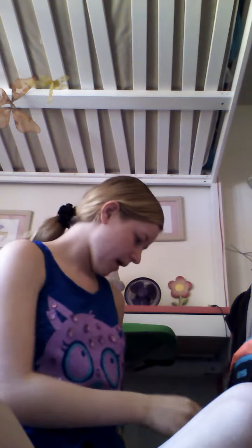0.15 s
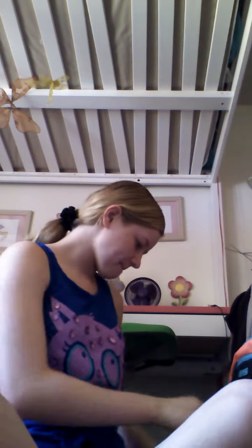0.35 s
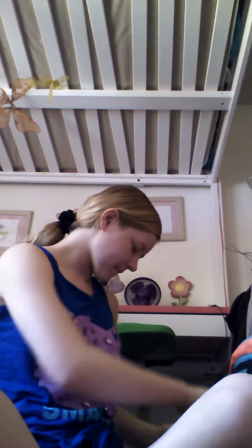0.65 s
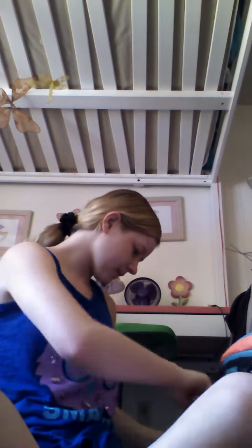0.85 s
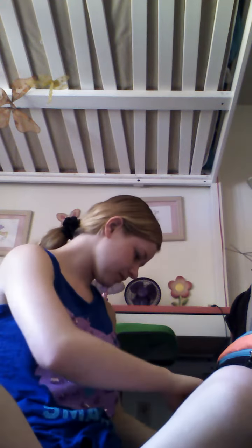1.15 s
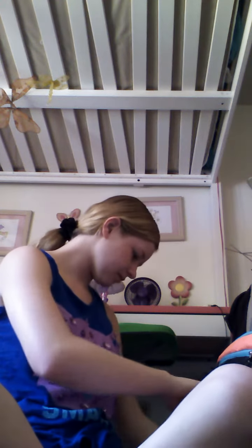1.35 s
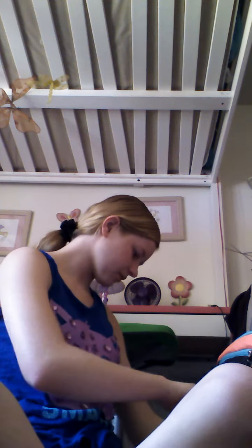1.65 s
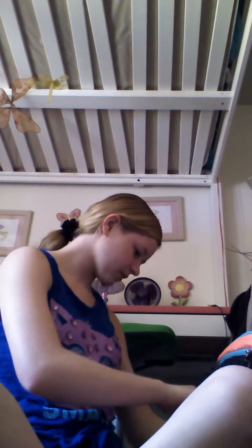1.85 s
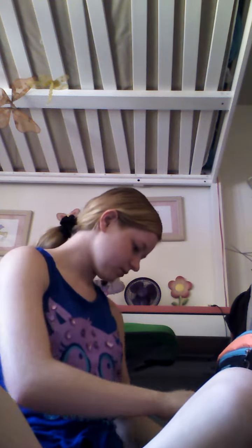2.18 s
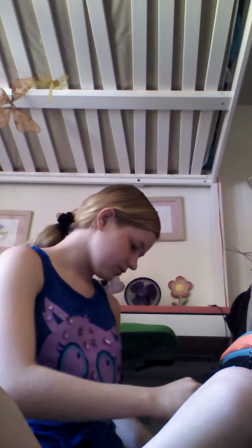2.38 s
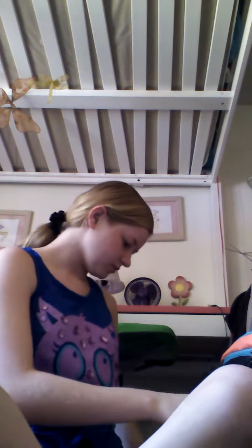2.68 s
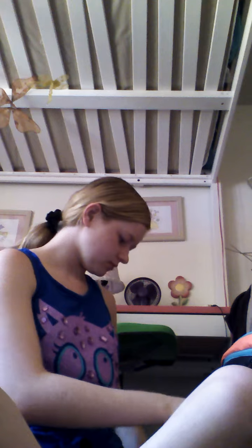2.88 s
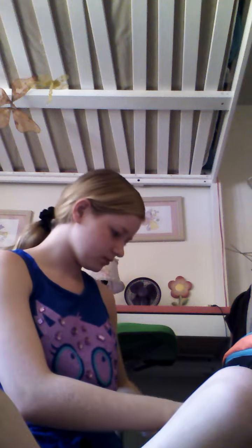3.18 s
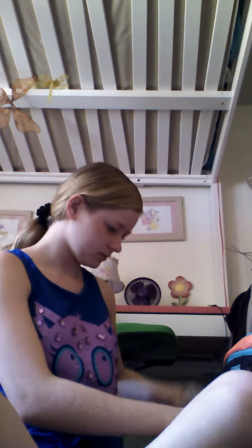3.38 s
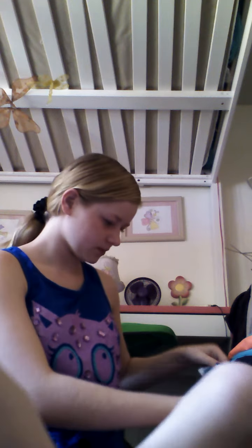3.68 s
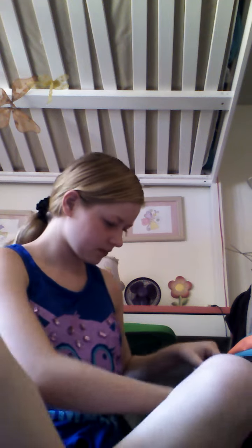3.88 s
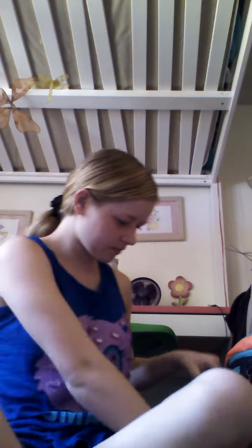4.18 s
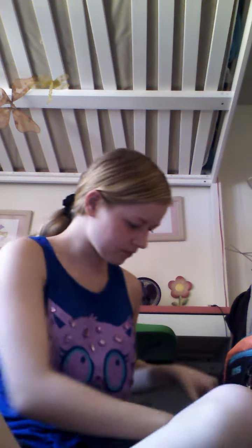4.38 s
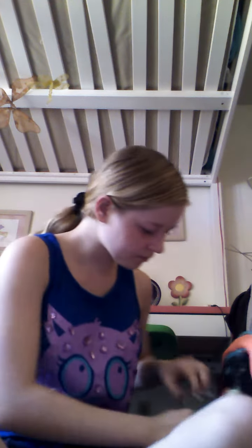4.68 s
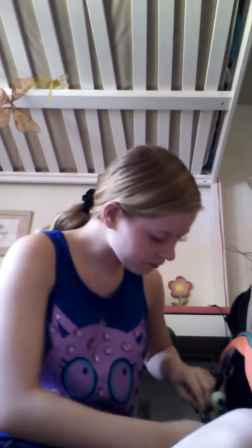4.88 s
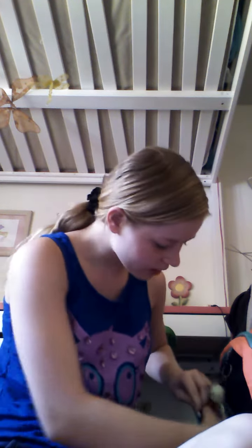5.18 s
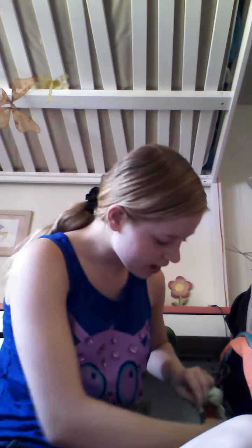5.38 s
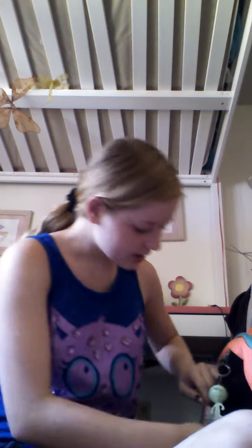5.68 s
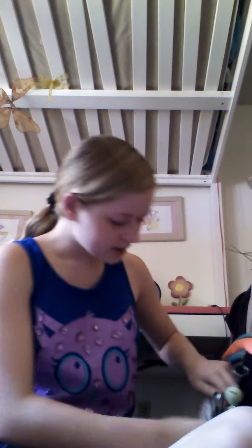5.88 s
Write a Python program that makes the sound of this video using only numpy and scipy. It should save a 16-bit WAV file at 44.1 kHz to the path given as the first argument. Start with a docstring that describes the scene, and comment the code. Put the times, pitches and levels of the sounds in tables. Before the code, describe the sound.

One quick zip clicks to a stop, then after faint handling come two more zips, small ticks and fabric rustling.

```python
"""A coil zipper on a nylon backpack runs in three jerky pulls, the first ending on its stop.
Its teeth excite the fabric periodically, so pitch follows the speed of the slider. Hands knock the bag,
plastic charms and the pull tab tick (damped vibration), and cloth rubs and squeaks (friction).
A quiet bedroom reverberates briefly, and coarse quantisation makes its noise floor grainy."""
import sys
import numpy as np
from scipy import signal
from scipy.fft import rfft, irfft, next_fast_len
from scipy.io import wavfile
from scipy.ndimage import uniform_filter1d, map_coordinates

SR = 44100
rng = np.random.default_rng(int(sys.argv[2]) if len(sys.argv) > 2 else 0)


def to_wav(s):
    """Save 16-bit WAV."""
    ch = np.atleast_2d(s).T  # columns
    pcm = np.round(np.clip(ch, -1, 1) * 32767)  # PCM
    wavfile.write(sys.argv[1], SR, pcm.astype(np.int16))


N = 266319

# Noise spectra. Each row: frequency in Hz, relative spectral density in dB.
FLOOR_SPECTRUM = [(12, -36), (20, -1.5), (26, -20), (59, -6), (87, -17), (144, -3), (225, -15),
                  (274, -17.5), (372, -13.5), (667, -28), (857, -29.5), (1580, -30), (2210, -32),
                  (15500, -53.5)]
CLOTH_BODY_SPECTRUM = [(35, -58.5), (60, -22), (141, -4), (240, -12), (350, -9), (550, -15.5), (710, -19.5),
                       (1100, -23.5), (1430, -50.5), (2420, -120)]
CLOTH_MIDDLE_SPECTRUM = [(470, -25.5), (800, -8), (1330, -2.5), (1500, 0.5), (1610, 2.5), (4000, -16),
                         (5200, -47.5), (8800, -120)]
CLOTH_HISS_SPECTRUM = [(1760, -13), (3000, 0), (4690, -9), (6650, -3.5), (7480, -13), (9310, -22),
                       (12500, -19.5), (13700, -16.5), (15500, -30)]
TOOTH_CLICK_SPECTRUM = [(760, -30.5), (1300, -12), (1440, -8), (1700, -7), (1960, -3), (2210, -4.5),
                        (3370, -21), (5000, -30), (6500, -62), (11000, -120)]
SLIDER_SCRAPE_SPECTRUM = [(1760, -13.5), (3000, -6), (3130, -4.5), (5450, -15.5), (6610, -12),
                          (7320, -24.5), (8700, -25), (10800, -28.5), (13500, -26), (15500, -32.5)]
# Reverberation of the room. Each row: frequency in Hz, time to decay by 60 dB in seconds.
ROOM_T60 = [(150, 0.29), (1500, 0.21), (10000, 0.16)]
# Squeaks, thin whistles and a low thrum.
# Each row: start and end in seconds, level in dB, frequency in Hz, linewidth in Hz.
HELD_TONES = [(0.561, .64, -67, 720, 90), (4.003, 4.085, -49.5, 3060, 380), (4.141, 4.18, -47.5, 3113, 400),
              (4.576, 4.623, -79, 14070, 8), (5.277, 5.307, -53.5, 4380, 500), (5.552, 5.598, -53, 148, 5),
              (5.599, 5.652, -45, 146, 4.6), (5.844, 5.885, -69, 14070, 30)]
# Cloth on cloth. Each row: peak time, swell time and 60 dB decay time in seconds,
# then relative levels of body, middle and hiss in dB.
CLOTH_RUBS = [(.248, 0.0091, .36, -35, -42, -50), (0.611, 0.14, 0.23, -64, -76, -87.5),
              (.738, 0.023, 0.3, -53.5, -61, -88.5), (0.924, 0.18, 0.16, -68, -67, -87),
              (1.002, 0.019, 0.27, -54.5, -55, -78), (1.33, 0.37, 0.69, -74.5, -74, -85),
              (1.482, 0.034, 0.43, -47.5, -52.5, -68), (1.834, 0.21, 0.14, -60, -64.5, -73.5),
              (2.261, 0.021, 0.71, -66, -73, -79), (2.394, 0.022, 0.14, -64.5, -80, -80.5),
              (3.276, 0.038, 0.67, -61.5, -67, -89.5), (3.678, 0.09, 1, -47, -55, -67),
              (4.299, 0.038, .8, -49.5, -57.5, -69), (4.528, 0.037, 0.37, -59, -74, -82),
              (4.575, .01, 0.38, -51, -57, -66.5), (4.854, .012, 0.54, -48, -54, -69.5),
              (4.957, 0.017, 0.25, -53, -66, -66), (5.23, .15, .4, -70, -70, -82.5),
              (5.306, 0.067, 0.47, -52.5, -56, -61.5), (5.57, .07, 0.5, -49, -46.5, -75),
              (5.628, 0.15, 0.42, -45.5, -51, -65.5), (5.82, 0.0054, 0.43, -42, -46, -60.5),
              (5.879, 0.15, 0.19, -43.5, -52, -53.5), (6.039, 0.065, .2, -50, -51, -80)]
# Hands and slider striking the bag. Each row: start in seconds, relative level in dB, pitch in Hz.
BAG_KNOCKS = [(0.2445, -26, 307), (0.262, -27.5, 478), (0.289, -38, 368), (0.733, -54.5, 251),
              (1.0, -41, 367), (1.474, -44, 271.5), (1.588, -55.5, 457), (1.827, -55, 442),
              (2.259, -52.5, 356), (2.308, -58, 315), (2.39, -56, 411), (3.258, -50.5, 428),
              (3.28, -46, 532), (3.321, -39, 533), (3.342, -38, 585), (3.852, -51.5, 331),
              (3.891, -42.5, 407), (4.239, -33, 460), (4.3, -35.5, 496.7), (4.521, -45.5, 355),
              (4.808, -59.5, 242), (4.846, -45.5, 316), (4.903, -41, 296), (4.953, -36, 323),
              (5.307, -56.5, 362), (5.421, -54.5, 422), (5.556, -42.5, 448), (5.685, -51, 485),
              (5.736, -48.5, 438), (5.816, -29, 337), (5.849, -40, 387), (5.891, -36.5, 359)]
# Charms and pull tab. Each row: start in seconds, relative level in dB, pitch in Hz.
CHARM_TICKS = [(0.2412, -28.5, 2060), (0.2624, -32, 1839), (0.7376, -56.5, 1996), (0.9186, -59, 1488),
               (1.0008, -50.5, 1743), (1.0186, -52, 1274), (1.0997, -57, 1477), (1.4748, -43, 1802),
               (1.4849, -45, 1930), (1.5049, -48.5, 2027), (1.7883, -57.5, 3150), (2.2647, -61.5, 1310),
               (3.0954, -58.5, 1550), (3.7559, -46, 1656), (3.897, -50.5, 1945), (4.572, -32.5, 1945),
               (4.5814, -33.5, 1850), (4.5994, -36, 2110), (4.6778, -69.5, 2040), (4.73, -57.5, 1976),
               (4.8519, -52.5, 2040), (4.887, -47, 3100), (4.958, -50.5, 2090), (5.3025, -38.5, 2615),
               (5.3032, -34, 4100), (5.3146, -40, 3810), (5.3547, -51.5, 3705), (5.5186, -52.5, 1542),
               (5.8199, -40, 1825), (5.8785, -48, 2040), (6.0264, -58, 1420)]
# The slider's travel, one list per pull. Each row: time in seconds, tooth rate in Hz,
# then relative levels of panel fundamental, overtones, clicks and scrape in dB.
ZIPPER_PULLS = [
    [(0.085, 379.8, -82.5, -89, -75, -84), (0.126, 581.7, -50, -70, -55.5, -68),
     (0.15, 714.4, -45.5, -74, -60.5, -60), (0.172, 850, -55.5, -63.5, -51, -54.5),
     (0.194, 850.4, -49, -52, -47.5, -51.5), (0.212, 1065, -57, -53.5, -53.5, -56.5),
     (0.243, 1016, -38.5, -53, -44, -42)],
    [(3.345, 146, -57.5, -68.5, -102.5, -71), (3.381, 203.4, -38, -41.5, -56.5, -91.5),
     (3.411, 315, -41.5, -33, -58, -69.5), (3.432, 375.3, -41, -35.5, -44, -57.5),
     (3.455, 482, -47.5, -41, -42, -52.5), (3.467, 496, -28.5, -45, -38.5, -49),
     (3.495, 493, -38.5, -44.5, -34.5, -49), (3.531, 493, -31, -43, -32.5, -46),
     (3.55, 496.6, -51, -33, -36, -44), (3.568, 430.5, -35.5, -43, -57.5, -55.5),
     (3.59, 452.3, -36, -40, -48, -46), (3.612, 499.3, -53.5, -56.5, -42.5, -55),
     (3.632, 493, -36.5, -47, -42.5, -50), (3.654, 493.6, -55, -75, -55.5, -60.5),
     (3.69, 450, -77, -76, -77, -99.5)],
    [(3.945, 178.6, -52.5, -59, -61, -63.5), (3.965, 230.3, -38, -55.5, -59.5, -63.5),
     (3.991, 404.7, -36, -53, -50, -55.5), (4.015, 502.3, -46, -42, -51.5, -51),
     (4.03, 568.6, -45.5, -61.5, -41.5, -50.5), (4.067, 602, -52, -49, -45, -49.5),
     (4.084, 662.8, -52, -56, -48.5, -50.5), (4.093, 538.8, -36.5, -54, -49.5, -52.5),
     (4.106, 397.7, -35.5, -58, -60, -54.5), (4.13, 317.8, -36.5, -60.5, -49.5, -51),
     (4.196, 390.7, -38.5, -51.5, -55.5, -51.5), (4.21, 368.4, -44.5, -62, -61.5, -58.5),
     (4.224, 336.4, -48, -41, -45, -55.5), (4.268, 289, -40, -53.5, -52, -51),
     (4.33, 266.5, -75, -92.5, -83, -69.5)],
]


def amp(db):
    """Amplitude ratio of a level in decibels."""
    return 10 ** (np.asarray(db) / 20)


def unit(x):
    """Normalisation to an rms of 1."""
    return x / np.sqrt(np.mean(x ** 2) + 1e-20)


def along(points, hz):
    """Interpolation of (Hz, value) points on a logarithmic frequency axis."""
    freqs, values = np.transpose(points)
    return np.interp(np.log(hz + 1), np.log(freqs + 1), values)


def wobble(knots_per_s):
    """Smooth random modulation: a spline through Gaussian values."""
    knots = rng.standard_normal(int(N * knots_per_s / SR) + 4)
    return map_coordinates(knots, [np.arange(N) * knots_per_s / SR])


def filtered(x, response):
    """Linear filtering: the spectrum is multiplied by a frequency response."""
    size = next_fast_len(N + 8192)
    return irfft(rfft(x, size) * response(np.fft.rfftfreq(size, 1 / SR)), size)[:N]


def coloured(x, spectrum):
    """Spectral shaping by (Hz, dB) points, at an rms of 1."""
    return unit(filtered(x, lambda hz: amp(along(spectrum, hz))))


def pull_curves():
    """Smoothed interpolation of tooth rate and the four levels, plus a gate open during each pull."""
    t, gate = np.arange(N) / SR, np.zeros(N)
    times, *columns = np.transpose(sorted(tuple(row) for pull in ZIPPER_PULLS for row in pull))
    for pull in ZIPPER_PULLS:
        gate[(t >= pull[0][0]) & (t <= pull[-1][0])] = 1
    curves = [uniform_filter1d(np.interp(t, times, column), size=350) for column in columns]
    return curves + [np.abs(uniform_filter1d(gate, 300))]


def noise_floor(level_db=-79):
    """Broadband noise of room and microphone, strongest in the bass and wavering slightly."""
    return amp(level_db + 1.8 * wobble(36)) * coloured(rng.standard_normal(N), FLOOR_SPECTRUM)


def reverberation(x):
    """Convolution with a diffuse room response, whose high frequencies decay fastest."""
    hz, t, spectra = signal.stft(rng.standard_normal(SR // 2), SR, nperseg=256)
    decay = amp(-60 * t / along(ROOM_T60, hz)[:, None])
    tail = signal.istft(spectra * decay, SR, nperseg=256)[1]
    delayed = np.pad(x, (250, 0))
    return signal.fftconvolve(delayed, tail / np.linalg.norm(tail))[:N]


def held_tones():
    """Phase diffusion: a random walk of phase broadens each sine into a narrow band."""
    t, tones = np.arange(N) / SR, np.zeros(N)
    walk = np.cumsum(rng.standard_normal(N)) * np.sqrt(2 * np.pi / SR)
    walk = uniform_filter1d(walk, size=24)
    for start, end, db, hz, linewidth in HELD_TONES:
        gate = 1. * ((t > start) & (t < end))
        envelope = uniform_filter1d(uniform_filter1d(gate, size=500), size=300)
        tones += amp(db) * envelope * np.sin(2 * np.pi * hz * t + np.sqrt(linewidth) * walk)
    return amp(2.3 * wobble(74)) * tones


def cloth_envelopes(swell_db=30):
    """Incoherent sources add in power: the slider's drag and the rubs set body, middle and hiss."""
    t = np.arange(N) / SR
    _, tone_db, overtone_db, click_db, scrape_db, gate = pull_curves()
    panel = np.hypot(amp(tone_db), amp(overtone_db))
    drag = np.array([amp(-6) * panel, amp(click_db - 0.5), amp(scrape_db - 5)])
    power = (gate * drag) ** 2
    for peak, swell, t60, *band_db in CLOTH_RUBS:
        shape_db = np.minimum(swell_db * (t - peak) / swell, -60 * (t - peak) / t60)
        power += np.outer(amp(band_db), amp(shape_db)) ** 2
    return np.sqrt(power)


def cloth_friction():
    """Stick-slip friction: fibres slip in clumps, so three bands of noise share a grainy modulation."""
    body, middle, hiss = cloth_envelopes()
    clumps = wobble(45)

    def grain(spectrum, clump_db, flutter_db):
        modulation = amp(clump_db * clumps + flutter_db * wobble(500))
        return coloured(modulation * rng.standard_normal(N), spectrum)

    return (amp(-5.5) * body * grain(CLOTH_BODY_SPECTRUM, clump_db=3.8, flutter_db=1.5)
            + amp(-7) * middle * grain(CLOTH_MIDDLE_SPECTRUM, clump_db=2.7, flutter_db=2.3)
            + amp(1) * hiss * grain(CLOTH_HISS_SPECTRUM, clump_db=1.4, flutter_db=1.9))


def impacts(events, t60_s, rise_s, mode_spread, rattle_gain, band_ratio, linger, crack_gain, crack_hz):
    """Damped free vibration: each blow cracks, rings four modes and leaves a longer rattle of noise."""
    out, t = np.zeros(N + SR), np.arange(SR // 4) / SR
    decay_db = -60 * t / t60_s
    rise = 1 - np.exp(-t / rise_s)
    crack_envelope = crack_gain * amp(-60 * t / .008)  # falls 60 dB in 8 ms
    lowpass = signal.butter(3, crack_hz, fs=SR)
    for start, db, hz in events:
        side_hz = hz * np.exp(mode_spread * rng.standard_normal((3, 1)))
        modes = np.sin(2 * np.pi * hz * t) + 0.24 * np.sin(2 * np.pi * side_hz * t).sum(0)
        band = signal.butter(2, [hz / band_ratio, hz * band_ratio], "band", fs=SR)
        rattle = rattle_gain * unit(signal.lfilter(*band, rng.standard_normal(len(t))))
        crack = crack_envelope * signal.lfilter(*lowpass, rng.standard_normal(len(t)))
        ring = rise * (amp(decay_db) * modes + amp(decay_db / linger) * rattle)
        out[round(start * SR):][:len(t)] += amp(db - 2.5) * (ring + crack)
    return out[:N]


def slider_stop(peak_s=.2432, level_db=-13, hz=720):
    """Heavy damping: the slider hits its stop and the taut panel swings once without ringing."""
    cycles = (np.arange(N) / SR - peak_s) * hz
    envelope = np.exp(-np.clip(cycles / 0.47, -9, 9) ** 2)
    return amp(level_db) * envelope * np.cos(2 * np.pi * cycles + 0.3)


def zipper():
    """Periodic forcing: each tooth tugs the fabric panel, clicks in the tape and chops the scrape."""
    tooth_hz, tone_db, overtone_db, click_db, scrape_db, gate = pull_curves()
    teeth_passed = np.cumsum(tooth_hz * (1 + .04 * wobble(120))) / SR  # hand speed is never even
    phase = 2 * np.pi * teeth_passed

    def harmonic(order, db):
        return amp(db + 3 * wobble(70)) * np.sqrt(2) * np.cos(order * phase + 0.57 * wobble(200))

    contacts = np.diff(np.floor(teeth_passed), prepend=0)
    impulses = unit(contacts * amp(2.3 * rng.standard_normal(N)) / np.sqrt(tooth_hz))
    chop = (1 + np.cos(phase)) ** 0.87
    clicks = coloured(impulses + 1.1 * unit(chop * rng.standard_normal(N)), TOOTH_CLICK_SPECTRUM)
    scrape = coloured(0.49 * impulses + unit(chop * rng.standard_normal(N)), SLIDER_SCRAPE_SPECTRUM)
    panel = harmonic(1, tone_db) + harmonic(2, overtone_db - 2.5) + harmonic(3, overtone_db - 5)
    return gate * (panel + amp(click_db - 5) * clicks + amp(scrape_db) * scrape)


def scene():
    """Superposition of all sources in one channel; only the impacts and the zipper reverberate."""
    knocks = impacts(BAG_KNOCKS, t60_s=.042, rise_s=.0014, mode_spread=0.33,
                     rattle_gain=0.3, band_ratio=1.6, linger=1.3, crack_gain=2.2, crack_hz=906)
    ticks = impacts(CHARM_TICKS, t60_s=.03, rise_s=.0004, mode_spread=0.17,
                    rattle_gain=0.25, band_ratio=1.3, linger=2.9, crack_gain=1.2, crack_hz=3350)
    direct = knocks + ticks + slider_stop() + zipper()
    room = noise_floor() + amp(-6.5) * reverberation(direct)
    return (room + cloth_friction() + held_tones() + direct)[None]


def record(dry):
    """Quantisation: rounding down flips the quiet floor between two values; hiss and a low-pass follow."""
    step, hiss_db, cutoff_hz = .00045, -95, 15600  # full scale is 1
    quantised = step * np.floor(dry[0] / step)
    hiss = amp(hiss_db) * rng.standard_normal(N)
    return filtered(quantised + hiss, lambda hz: hz < cutoff_hz)[None]


dry = scene()
out = record(dry)
to_wav(out)
```